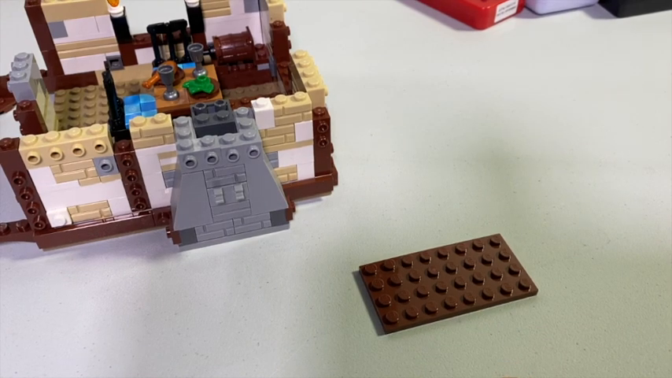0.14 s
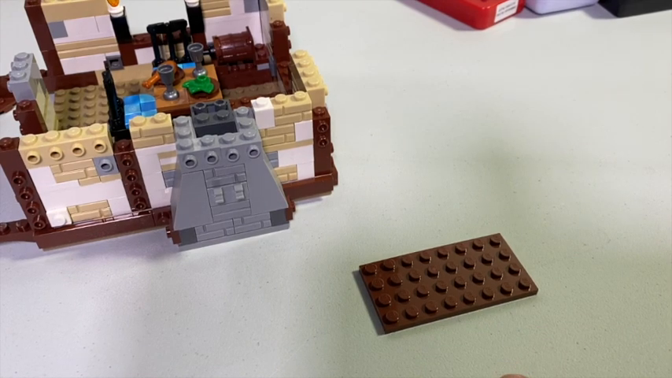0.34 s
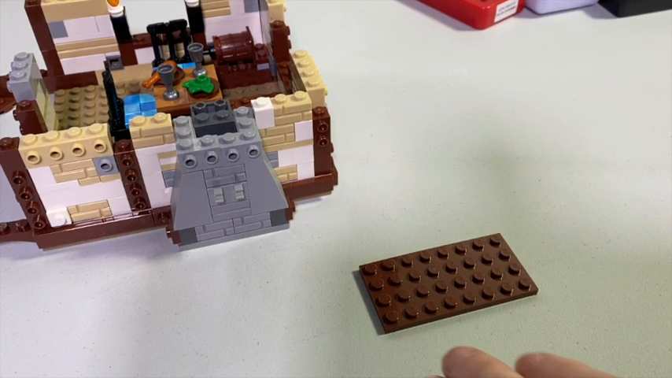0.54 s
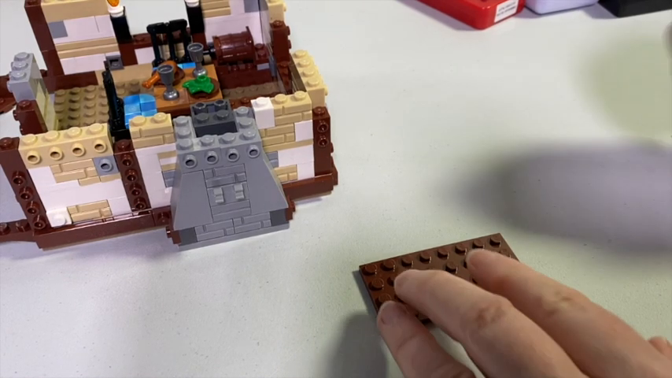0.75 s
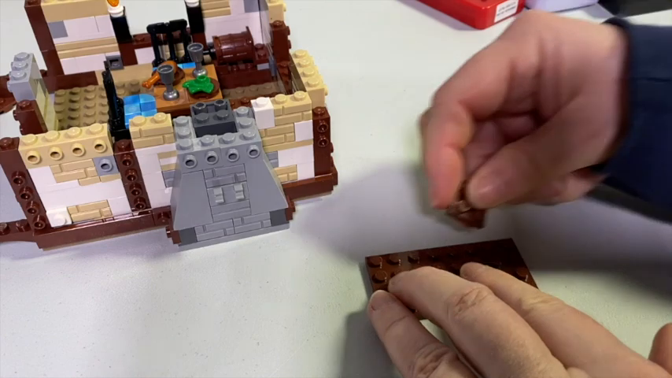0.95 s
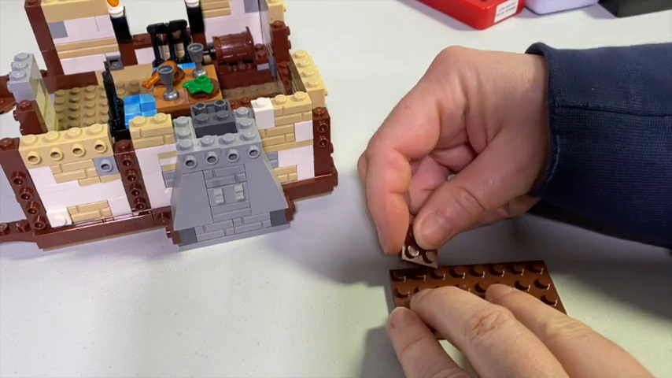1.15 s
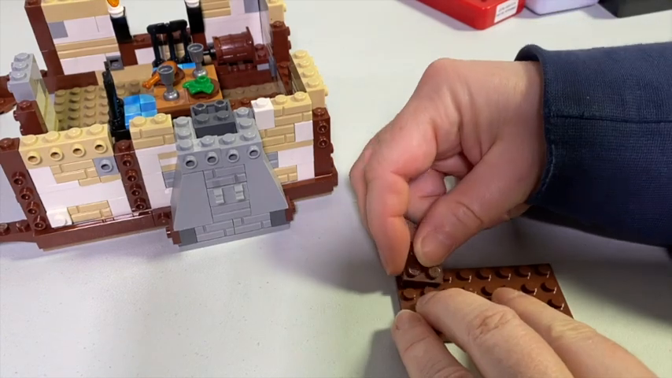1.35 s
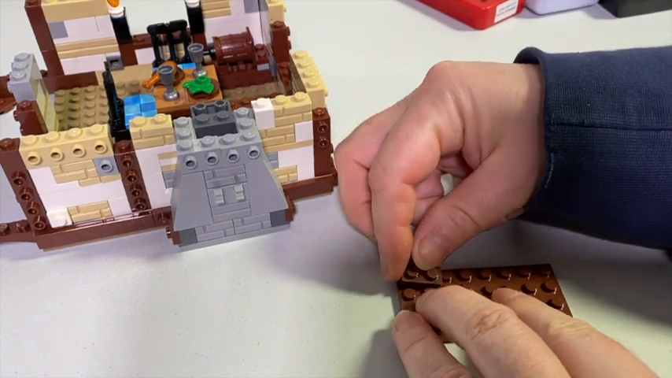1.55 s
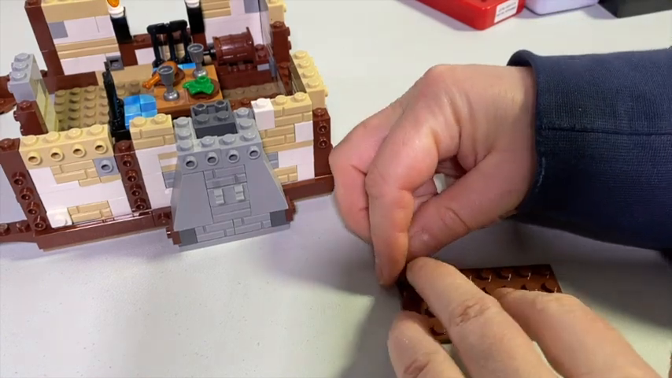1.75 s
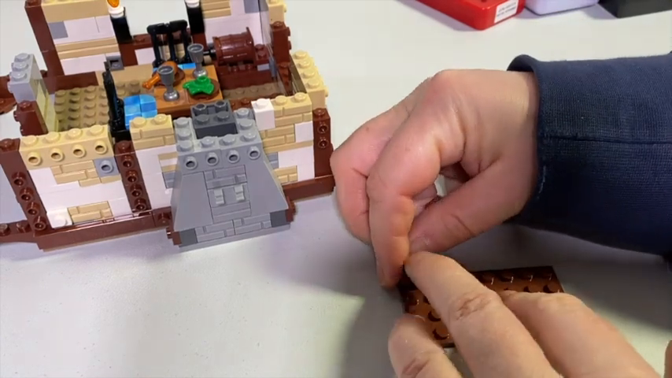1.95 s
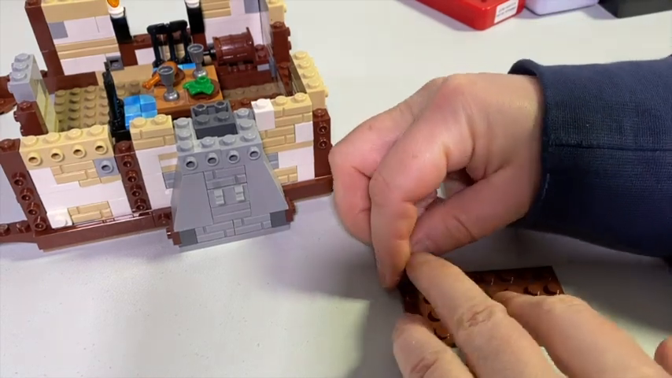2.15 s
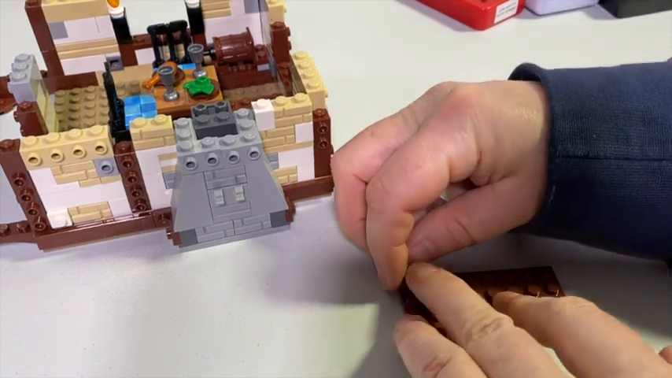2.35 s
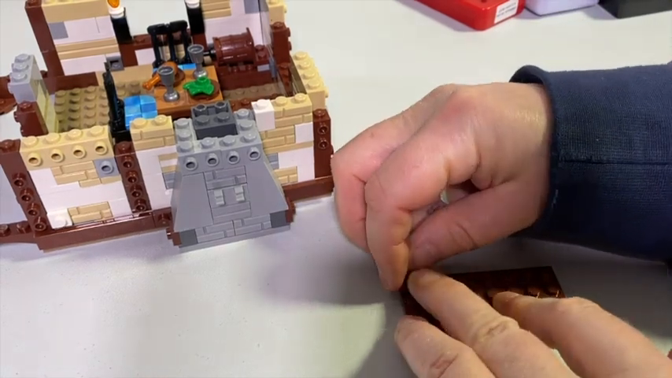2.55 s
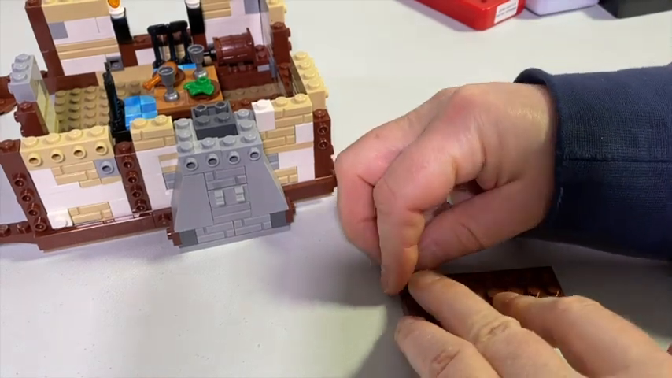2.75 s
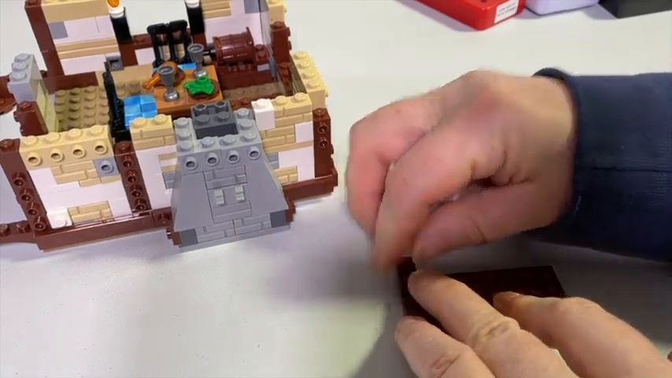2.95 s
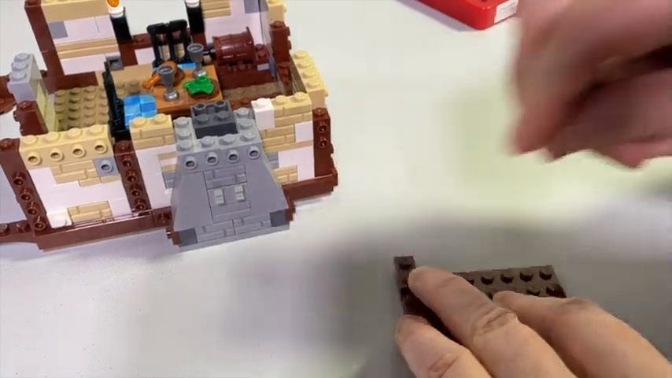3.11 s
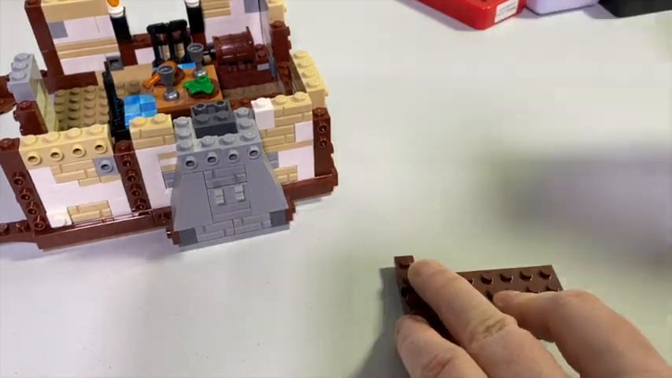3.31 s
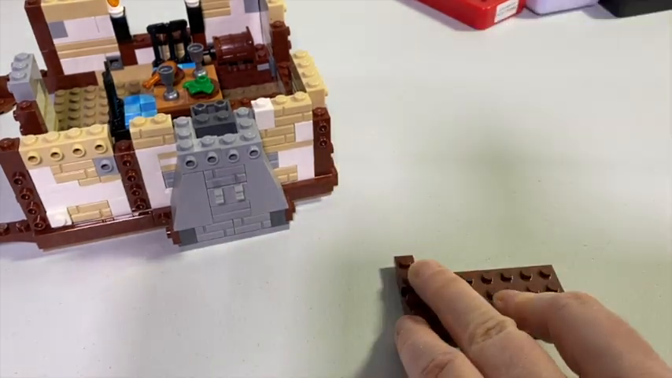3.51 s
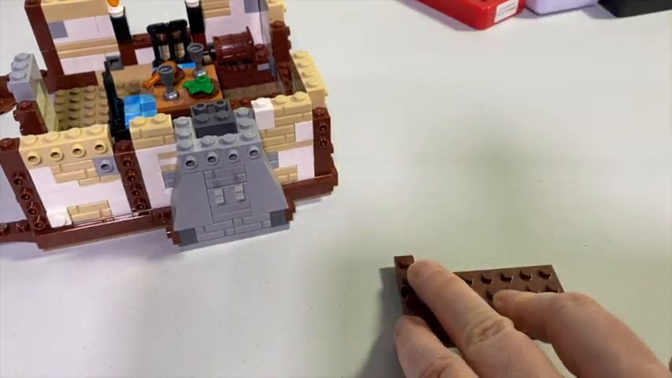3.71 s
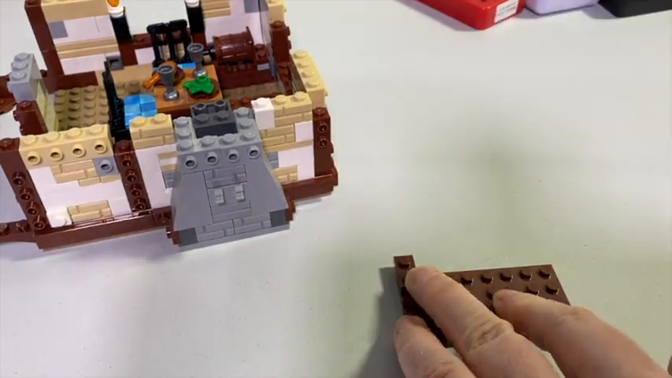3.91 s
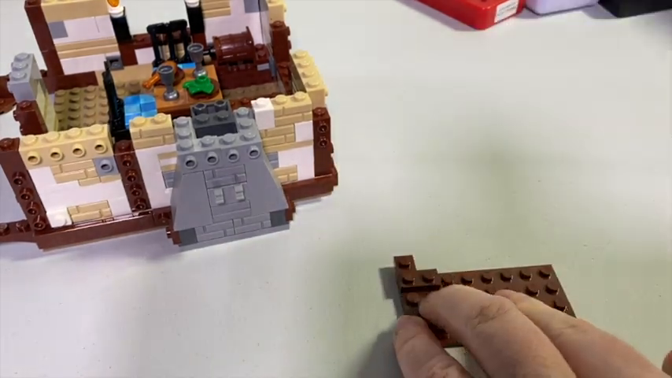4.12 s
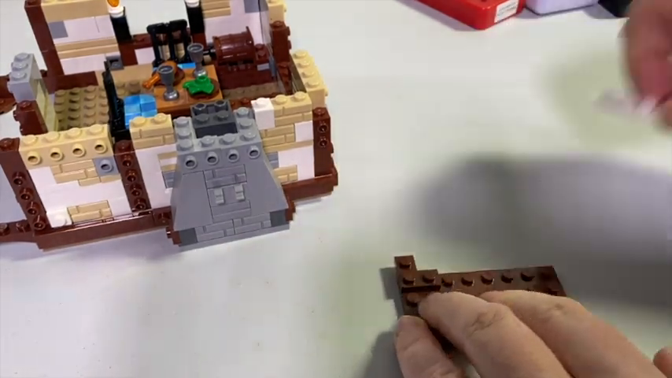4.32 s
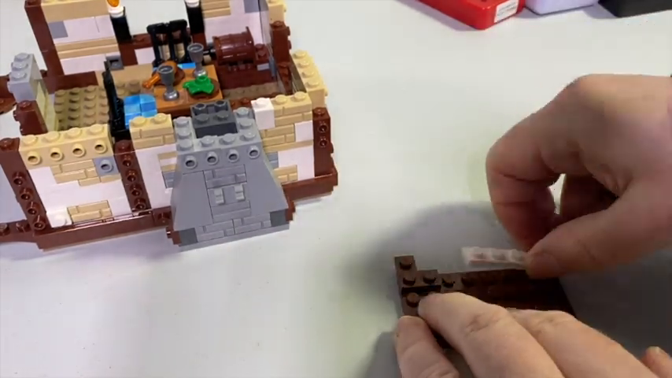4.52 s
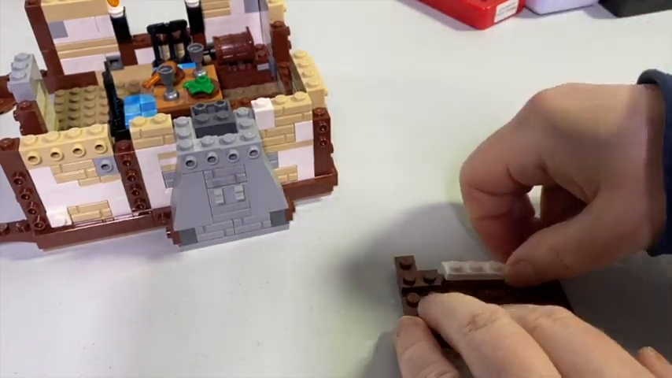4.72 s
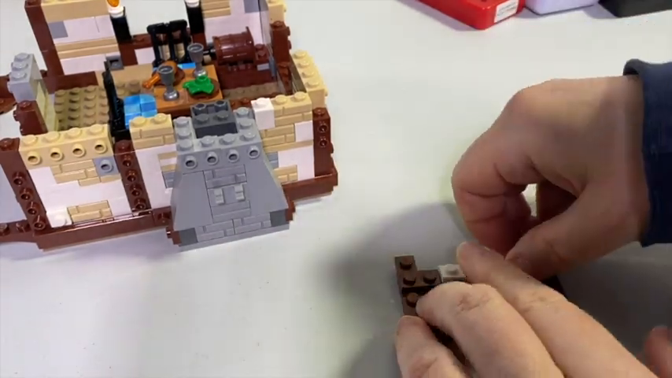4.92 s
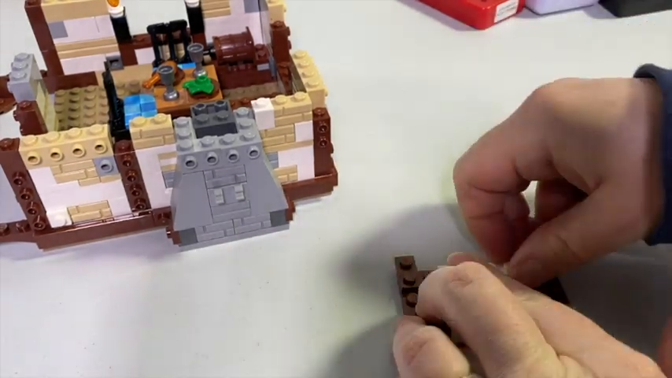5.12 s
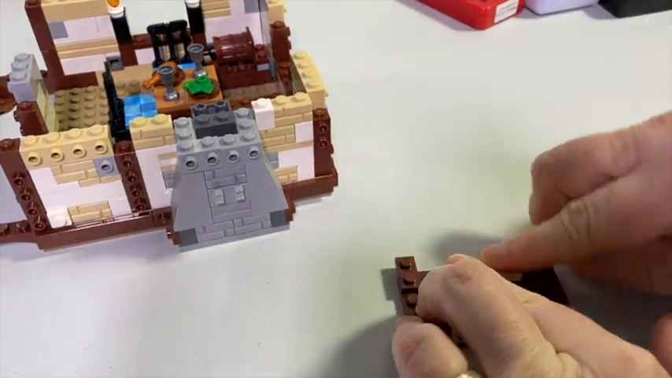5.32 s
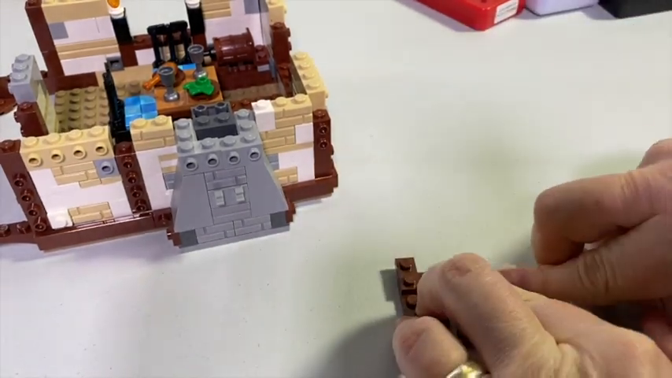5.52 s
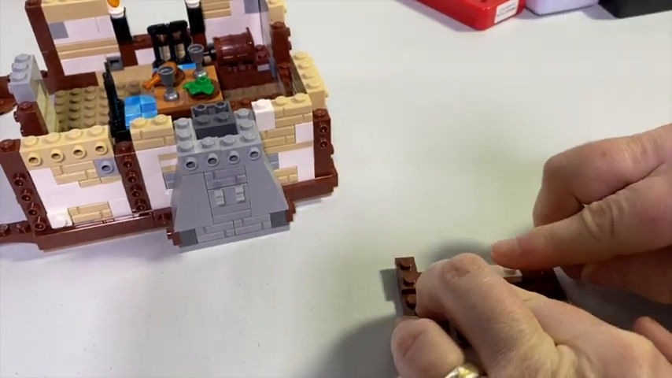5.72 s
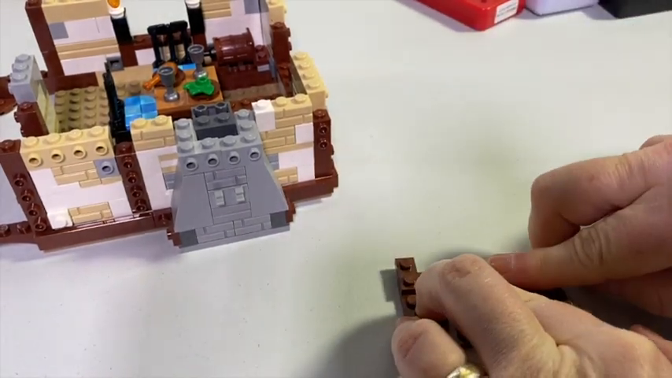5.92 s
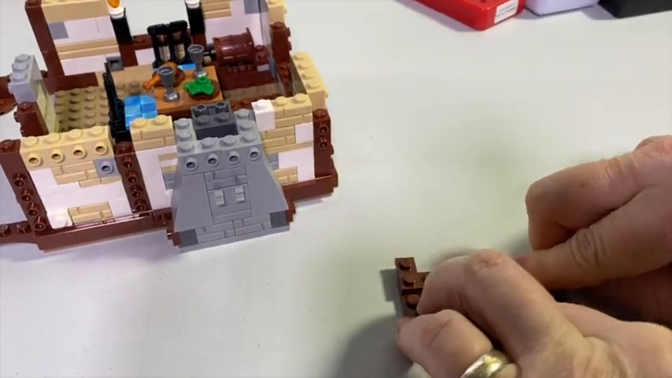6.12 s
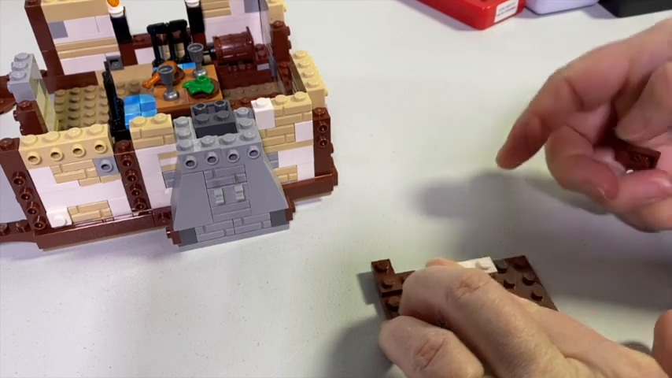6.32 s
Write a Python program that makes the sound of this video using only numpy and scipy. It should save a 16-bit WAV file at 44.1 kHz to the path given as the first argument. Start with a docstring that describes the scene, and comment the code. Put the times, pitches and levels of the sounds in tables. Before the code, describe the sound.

Small plastic bricks click and tick softly onto a plastic plate, fingers rustling, until one piece snaps home very loudly near the end.

```python
"""Plastic bricks on a plate

Fingers set small plastic bricks on a plastic plate on a table in a small quiet room. Each contact is a noise
crack at the studs plus ringing modes of plate and table; one tight brick snaps home loudly near 6 s.
A loose hollow piece ticks (resonant noise chatter), plastic drags (gritty noise swells), skin and sleeve rustle
(banded noise). A motor tone slows and dips, then picks up a little; a low hum wavers over rumble and hiss.
"""
import sys
import numpy as np
from scipy import signal
from scipy.io import wavfile

SR = 44100
rng = np.random.default_rng(int(sys.argv[2]) if len(sys.argv) > 2 else 0)


def attenuation_scalar(level_db):
    """Turn a level in dB into a linear amplitude multiplier (20 dB per decade)."""
    decades = np.asarray(level_db, float) / 20
    return 10 ** decades


def transcribe(u):
    """Save the signal u as a 16-bit wav file named by the first command-line argument.

    u: samples, shape (n,) or (channels, n), limited to [-1, 1]; the rate is SR.
    q: integer samples, one column per channel.
    """
    v = np.clip(np.atleast_2d(u).T, -1, 1)
    q = np.round(v * 32767).astype(np.int16)
    wavfile.write(sys.argv[1], SR, q)


N = 280476

# room rumble and microphone hiss, spectrum: f/Hz, density/dB per Hz
AIR_SPECTRUM = [(8.8, -29), (15, 10), (42, 0.5), (55, -4.5), (89, 8.5), (137, -47.5), (212, -10),
                (292, -8.5), (369, -15), (509, -21.5), (661, -30.5), (994, -28), (2380, -33.5),
                (11100, -36.5), (14500, -38), (15800, -61)]
# motor: t/s, turning f/Hz, level/dB
MOTOR_CURVE = [(0.0, 30.44, -61), (2.9, 30.14, -59.5), (3.26, 29.2, -56.5), (3.37, 27.8, -56),
               (3.95, 26.63, -57), (4.18, 26.6, -57.5), (4.3, 25.5, -74), (4.4, 23.52, -66.5),
               (5.4, 23.64, -67), (5.7, 24.9, -61), (6.36, 24.8, -61.5)]
# hum: t/s, level/dB
HUM_CURVE = [(0.0, -65), (3.26, -66), (3.36, -77), (3.8, -75), (3.98, -66.5), (5.0, -71), (5.2, -78),
             (5.5, -70), (6.36, -76.5)]
# skin and sleeve rubbing: t/s, level/dB
RUSTLE_CURVE = [(0.0, -108), (0.31, -77), (0.45, -83.5), (0.59, -77), (0.91, -69.5), (1.01, -65),
                (1.16, -68.5), (1.3, -89.5), (1.8, -85.5), (2.1, -93.5), (2.75, -105), (2.97, -78.5),
                (3.3, -82), (3.55, -96), (4.4, -86), (4.85, -91), (5.0, -83.5), (5.35, -75.5), (5.51, -79),
                (5.73, -91), (6.36, -73)]
# rubbing spectrum: f/Hz, density/dB per Hz
RUSTLE_SPECTRUM = [(65, -38), (110, 1), (147, 6.5), (222, -12.5), (274, 3.5), (488, -9.5), (709, -5.5),
                   (837, -10.5), (15500, -35.5)]
# brick contacts, drives: t/s, crack/dB, table knock/dB, plate/dB, table thump/dB
CONTACTS = [(0.0194, -72, -64.5, -66.5, -65), (0.0467, -59, -71.5, -66, -55.5),
            (0.1024, -65, -69, -67, -76), (0.258, -87, -78, -89, -60), (0.6874, -68, -64.5, -60, -75),
            (0.9626, -69, -62, -65, -65), (1.2727, -68, -75, -63.5, -70), (1.3043, -66, -70, -69, -78),
            (1.3768, -48.5, -54.5, -48, -66.5), (1.4126, -66, -69, -65, -73),
            (1.4542, -56, -59, -62.5, -71), (1.6265, -40, -46, -42, -57), (1.6745, -60, -61, -65, -61),
            (1.7239, -62, -78, -67, -64), (1.7421, -66, -53, -71, -55), (1.7503, -61, -76, -59.5, -54.5),
            (1.7577, -63, -81, -70, -76), (1.7764, -56, -84, -61, -80), (1.7864, -45, -50.5, -57, -62),
            (1.8804, -70, -70, -70.5, -75), (2.0359, -67, -63.5, -69.5, -70), (2.2561, -61, -68, -68, -71),
            (2.39, -36, -40.5, -45.5, -52), (2.5463, -46.5, -33.5, -51, -52.5),
            (2.9205, -77, -66.5, -77, -80), (3.756, -69.5, -56.5, -65.5, -68),
            (4.4005, -63, -72, -63.5, -68.5), (4.6301, -68, -71, -65, -65.5),
            (4.7243, -50.5, -53, -52, -62.5), (4.7522, -51.5, -64, -60.5, -61),
            (4.7679, -53, -55.5, -56.5, -73), (4.8997, -62, -83, -70, -79), (4.989, -64, -71, -76, -91),
            (5.0531, -49, -64.5, -53.5, -95), (5.1731, -61.5, -59, -68, -81), (5.3289, -64, -62, -67, -72),
            (5.6384, -37, -42.5, -41.5, -52.5), (5.773, -84, -61.5, -68, -67.5),
            (5.9668, -6.5, -18.5, -14.5, -42)]
# spans of fumbling fingers, holding the stray clicks: from t/s, to t/s
FUMBLING_SPANS = [(1.2, 2.8), (4.4, 5.9)]
# crack resonances: f/Hz, width/Hz, level/dB
STUD_RESONANCES = [(3610, 550, 1.5), (4320, 560, 3), (5820, 380, -2), (7500, 1100, -5.5),
                   (11400, 2600, -10), (15200, 950, -14)]
# plate modes: f/Hz, level/dB, t60/s
PLATE_MODES = [(1140, -4, 0.016), (1480, 8.5, 0.0052), (1850, -3, 0.015), (2090, -5.5, 0.014),
               (2380, 2.5, 0.008), (2810, 4, 0.012)]
# table modes heard in the knock: f/Hz, level/dB, t60/s
KNOCK_MODES = [(381.3, 0.5, 0.067), (448, -9.5, 0.066), (561.3, 0.5, 0.054), (653, 1, 0.029),
               (748, 4, 0.026), (826, 2.5, 0.028), (940, -10, 0.013)]
# table modes heard in the thump: f/Hz, level/dB, t60/s
THUMP_MODES = [(80, -2, 0.18), (120, -6, 0.082), (159, 4.5, 0.1), (195, 5.5, 0.082), (270.6, 5, 0.12)]
# near echoes: delay/ms, level/dB
NEAR_ECHOES = [(4.2, -20), (7.6, -15.5), (10.5, -22.5)]
# diffuse tail decay: f/Hz, t60/s
TAIL_T60 = [(100, 0.84), (400, 0.37), (1500, 0.37), (5000, 0.47), (9000, 0.27), (14000, 0.09)]
# diffuse tail colour: f/Hz, level/dB
TAIL_COLOUR = [(100, 1.5), (400, 2.5), (1500, -2.5), (5000, 0.5), (9000, 4.5), (14000, -3)]
# short drags of plastic over the table, drives: t/s, bright/dB, dull/dB, middle/dB
DRAG_EVENTS = [(0.0344, -66, -58, -51.5), (0.255, -92, -56, -84), (0.2925, -74.5, -69, -64.5),
               (0.819, -61, -55, -49), (1.4117, -67.5, -63, -68), (3.0202, -71, -56.5, -65),
               (3.7944, -70, -66, -58), (3.822, -68.5, -54, -62.5), (3.848, -67.5, -53.5, -67),
               (3.874, -81, -56, -57), (5.5046, -72, -55, -63.5), (6.3106, -62, -48.5, -56.5),
               (6.333, -85, -54.5, -64)]
# drag resonances, dull to bright: f/Hz, width/Hz, level/dB
DRAG_RESONANCES = [(310, 216, 12.5), (660, 430, 4), (1420, 1340, 4), (2420, 1700, -1), (4460, 1560, 7.5),
                   (6700, 4800, 3), (10500, 8400, -4)]
# loose piece, drive: t/s, level/dB
TICK_EVENTS = [(2.2117, -41.5), (2.3213, -41), (2.4601, -40), (2.5729, -43.5), (2.6513, -46), (4.353, -41),
               (6.3035, -43.5)]
# loose piece resonances: f/Hz, width/Hz, level/dB
HOLLOW_RESONANCES = [(564, 200, 12), (1470, 280, 5.5), (2315, 66, 13), (3460, 450, 8), (4630, 4300, 0),
                     (8300, 7100, -2), (10400, 1900, -1), (13500, 8400, -20)]

BAND_EDGES_HZ = 15 * 2 ** np.arange(0, 10.3, .5)
AIR_DB = -66
HUM_HZ, HUM_WAVER_DB = 61, 3
DULL_DB, BRIGHT_DB = 5, -2      # rustle registers re RUSTLE_CURVE
DULL_STEADY_DB = -75.5      # centre of the dull stir of resting hands
BRIGHT_SHARE, BRIGHT_PIVOT_DB = .75, -78      # treble follows part of the swing about the pivot
CONTACT_MS, SOFTER_MS_PER_DB = .72, .007      # contact rise; longer the more knock outweighs crack
STUD_GAP_MS, STUD_GAIN_DB = .5, 2      # three studs seat in turn, each stronger than the last
STRAY_DB, STRAY_SPREAD_DB = -74.5, 2
CLUTTER_DB, CLUTTER_T60_S = -12.5, 0.071      # scatter off hands and nearby bricks
TAIL_DB = -17
DRAG_RISE_S, DRAG_FADE_S = 0.0061, 0.018
TICK_ALL_ROUND_DB = 3.5


def rms_one(x):
    """Scale to unit rms."""
    return x / np.sqrt(np.mean(x ** 2) + 1e-20)


def in_time(rows):
    """Columns of a curve table, one value a sample."""
    s, *columns = np.transpose(rows)
    return [np.interp(np.arange(N) / SR, s, c) for c in columns]


def at_hz(points, hz):
    """Read a table on a log-frequency axis."""
    table = np.array(points)
    return np.interp(np.log(hz), np.log(table[:, 0]), table[:, 1])


def drift(corner_hz):
    """Slow random wander of unit rms: noise through two equal poles, run at SR / 40."""
    r = np.exp(-80 * np.pi * corner_hz / SR)
    noise = rng.standard_normal(N // 40 + 2002)
    slow = signal.lfilter([1], [1, -2 * r, r * r], noise)[2000:]
    return np.interp(np.arange(N) / 40, np.arange(len(slow)), rms_one(slow))


def bands(length):
    """Half-octave bands of noise at equal power per Hz, with their centres."""
    white = rng.standard_normal((2, length + SR))
    for k, (low, high) in enumerate(zip(BAND_EDGES_HZ, BAND_EDGES_HZ[1:])):
        sos = signal.butter(2, [low, high], "band", fs=SR, output="sos")
        yield np.sqrt(low * high), signal.sosfilt(sos, white[k % 2])[SR:]


def between(x, low_hz, high_hz):
    """Small or heavy bodies radiate only a span of pitches."""
    sos = signal.butter(2, [low_hz, min(high_hz, .45 * SR)], "band", fs=SR, output="sos")
    return signal.sosfilt(sos, x)


def coloured(x, resonances):
    """Resonances in parallel, signs alternating."""
    out = np.zeros(N)
    for k, (hz, width_hz, level_db) in enumerate(resonances):
        r = np.exp(-np.pi * width_hz / SR)
        b = (1 - r * r) / 2 * np.array([1, 0, -1])
        a = [1, -2 * r * np.cos(2 * np.pi * hz / SR), r * r]
        out += (-1) ** k * attenuation_scalar(level_db) * signal.lfilter(b, a, x)
    return out


def bursts(times_s, level_db, shape, grain_db=0):
    """Noise under one short envelope per event; shape(k, t) gives that of event k; grain makes it gritty."""
    envelope, t = np.zeros(N + SR), np.arange(SR // 10) / SR
    for k, s in enumerate(times_s):
        start = int(s * SR)
        envelope[start:start + len(t)] += attenuation_scalar(level_db[k]) * shape(k, t)
    grit = rms_one(attenuation_scalar(grain_db * drift(270)))
    return envelope[:N] * grit * rng.standard_normal(N) + 1e-18


def struck(times_s, level_db, modes, rise_s):
    """One blow sets every mode ringing; a slower contact leaves the higher modes weaker."""
    at, out = (np.asarray(times_s) * SR).astype(int), np.zeros(N)
    scatter_db = 1.5 * rng.standard_normal((len(at), len(modes)))
    for k, (hz, mode_db, t60_s) in enumerate(modes):
        blows = np.full(N, 1e-18)
        blows[at] = attenuation_scalar(level_db + mode_db + scatter_db[:, k] - 10 * (hz * rise_s) ** 2)
        r, w = attenuation_scalar(-60 / (t60_s * SR)), 2 * np.pi * hz / SR
        out += signal.lfilter([0, np.sin(w)], [1, -2 * r * np.cos(w), r * r], blows)
    return out


def air():
    """Room rumble and microphone hiss: noise bands, each wandering in level."""
    noise = sum(band * attenuation_scalar(at_hz(AIR_SPECTRUM, hz) + 2.3 * drift(2.5)) for hz, band in bands(N))
    return attenuation_scalar(AIR_DB) * rms_one(noise)


def motor():
    """The turning tone of a slow motor, wavering, with a faint third partial."""
    hz, level_db = in_time(MOTOR_CURVE)
    phase = 2 * np.pi * np.cumsum(hz + 0.2 * drift(3.5)) / SR
    tone = np.sin(phase) + attenuation_scalar(-17.5) * np.sin(3 * phase)
    return np.sqrt(2) * attenuation_scalar(level_db + 1.8 * drift(2.5)) * tone


def hum():
    """A low sine whose level wanders at random about its curve, pitch slightly unsteady."""
    level_db, = in_time(HUM_CURVE)
    phase = 2 * np.pi * np.cumsum(HUM_HZ + .5 * drift(4)) / SR
    return np.sqrt(2) * attenuation_scalar(level_db + HUM_WAVER_DB * drift(4.5)) * np.sin(phase)


def rustle():
    """Rubbing noise in three registers; all bands throb together as skin sticks and slips."""
    level_db, = in_time(RUSTLE_CURVE)
    middle = attenuation_scalar(level_db)
    dull = np.hypot(middle * attenuation_scalar(DULL_DB), attenuation_scalar(DULL_STEADY_DB + 1.8 * drift(3.2)))
    bright = attenuation_scalar(level_db + BRIGHT_DB + (BRIGHT_SHARE - 1) * (level_db - BRIGHT_PIVOT_DB))
    throb_db = 0.6 * drift(32) + 3.3 * drift(130)
    registers = np.zeros((3, N))
    for hz, band in bands(N):
        if hz > 110:
            register = np.searchsorted([600, 3000], hz)      # splits/Hz
            registers[register] += band * attenuation_scalar(at_hz(RUSTLE_SPECTRUM, hz) + throb_db + 1.3 * drift(15))
    return sum(gain * rms_one(part) for gain, part in zip([dull, middle, bright], registers))


def bricks():
    """A contact cracks at the studs and rings plate and table; returns direct sound and room feed."""
    s, crack_db, knock_db, plate_db, thump_db = np.transpose(np.r_[CONTACTS, stray_clicks(count=12)])
    rise_s = np.clip(CONTACT_MS + SOFTER_MS_PER_DB * (knock_db - crack_db), .1, 3) / 1000
    seated = ((s + rise_s) * SR).astype(int)

    def crack_shape(k, t):
        return t / rise_s[k] * np.exp(1 - t / rise_s[k]) + 0.19 * np.exp(-t / 0.0062)

    crack = bursts(s, crack_db, crack_shape)
    gaps_s = STUD_GAP_MS / 1000 * rng.uniform(.8, 1.25, (len(s), 3)) * np.arange(3)
    for k, late_s in enumerate(gaps_s.T):      # one sharp impulse per stud, signs alternating
        crack[seated + (late_s * SR).astype(int)] -= (-1) ** k * attenuation_scalar(crack_db + 11.0 + STUD_GAIN_DB * k)
    plate = -struck(s + rise_s, plate_db, PLATE_MODES, 0 * rise_s)      # answers at peak contact force
    knock = struck(s, knock_db, KNOCK_MODES, rise_s)
    thump = struck(s, thump_db, THUMP_MODES, rise_s)
    table = between(between(knock, 310, 970), 270, 3000) + between(thump, 52, 300)
    direct = coloured(crack, STUD_RESONANCES) + between(plate, 1100, 2300) + table
    # over all directions the small resonances even out: plain band-limited impulses
    crack_hits, plate_hits = np.zeros((2, N))
    crack_hits[seated] = attenuation_scalar(crack_db + 9.5)
    plate_hits[seated] = attenuation_scalar(plate_db + 33.5)
    all_round = between(plate_hits, 820, 2400) - between(crack_hits, 2700, 13000) + table
    return direct, all_round


def room(direct, all_round):
    """Direct sound, near echoes and clutter, then a diffuse tail that builds up and rings longest in the bass."""
    t = np.arange(SR // 2) / SR
    clutter = rng.standard_normal(len(t)) * attenuation_scalar(-60 * t / CLUTTER_T60_S)
    near = attenuation_scalar(CLUTTER_DB) * rms_one(clutter) / np.sqrt(len(t))      # unit energy before gain
    for ms, echo_db in NEAR_ECHOES:
        near[int(ms * SR / 1000)] += attenuation_scalar(echo_db)
    tail = sum(band * attenuation_scalar(at_hz(TAIL_COLOUR, hz) - 60 * t / at_hz(TAIL_T60, hz))
               for hz, band in bands(len(t)))
    tail *= 1 - np.exp(-(t / 0.012) ** 2)      # the walls answer only after a while
    tail = attenuation_scalar(TAIL_DB) * rms_one(tail) / np.sqrt(len(t))
    # skin and cloth swallow treble
    dull = signal.sosfilt(signal.butter(1, 7000, fs=SR, output="sos"), direct)
    return direct + (signal.fftconvolve(dull, near) + signal.fftconvolve(all_round, tail))[:N]


def drags():
    """Each drag is a gritty swell of rubbing noise in the dull, middle and bright resonances of the plate."""
    s, bright_db, dull_db, middle_db = np.transpose(DRAG_EVENTS)

    def swell(k, t):
        return 2 * (1 - np.exp(-t / DRAG_RISE_S)) * np.exp(-t / DRAG_FADE_S)

    dull = coloured(bursts(s, dull_db, swell, grain_db=2.5), DRAG_RESONANCES[:2])
    middle = coloured(bursts(s, middle_db, swell, grain_db=5), DRAG_RESONANCES[2:4])
    bright = coloured(bursts(s, bright_db, swell, grain_db=5), DRAG_RESONANCES[4:])
    return dull + middle + bright


def stray_clicks(count):
    """Faint random contacts while the fingers fumble, as rows like CONTACTS."""
    spans = np.array(FUMBLING_SPANS)[np.arange(count) % len(FUMBLING_SPANS)]
    s = spans[:, 0] + rng.random(count) * (spans[:, 1] - spans[:, 0])
    return np.c_[s, STRAY_DB + STRAY_SPREAD_DB * rng.standard_normal((count, 4))]


def loose_piece():
    """A light piece chatters for a few ms and its hollow rings; all round only the broad chatter is left."""
    s, level_db = np.transpose(TICK_EVENTS)

    def chatter_shape(k, t):
        return (1 - np.exp(-t / 0.0004)) * np.exp(-t / 0.0033)

    chatter = bursts(s, level_db, chatter_shape)
    return coloured(chatter, HOLLOW_RESONANCES), attenuation_scalar(TICK_ALL_ROUND_DB) * between(chatter, 450, 5800)


def scene():
    """Contacts, ticks and drags in the room, over the continuous layers."""
    brick_direct, brick_round = bricks()
    tick_direct, tick_round = loose_piece()
    drag = drags()
    hits = room(brick_direct + tick_direct + drag, brick_round + tick_round + drag)
    return (hits + rustle() + motor() + hum() + air())[None]


def top_cut(x):
    """Nothing passes above the cut-off."""
    return signal.sosfilt(signal.butter(12, 17010, fs=SR, output="sos"), x)


def record(dry):
    """The microphone fades at the top and overloads softly toward a ceiling on the loudest peak."""
    ceiling = 0.66
    heard = signal.sosfilt(signal.butter(4, 15300, fs=SR, output="sos"), dry)
    mix = heard / (1 + np.abs(heard / ceiling) ** 4) ** (1 / 4)
    return top_cut(mix)


dry = scene()
out = record(dry)
transcribe(out)
```